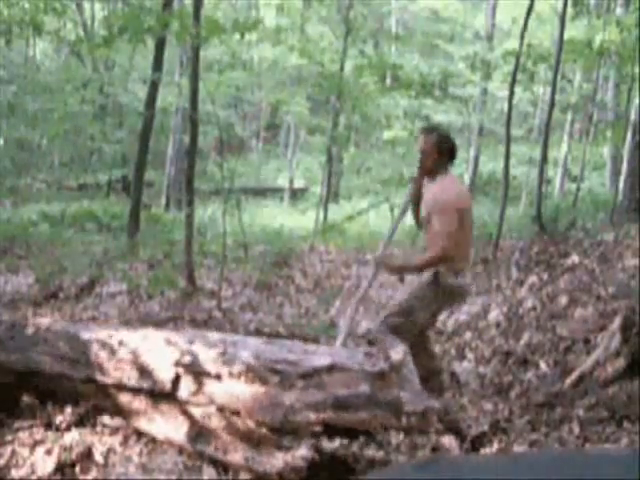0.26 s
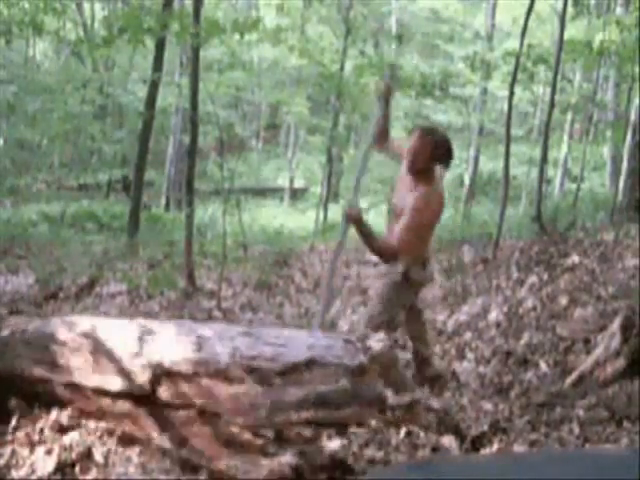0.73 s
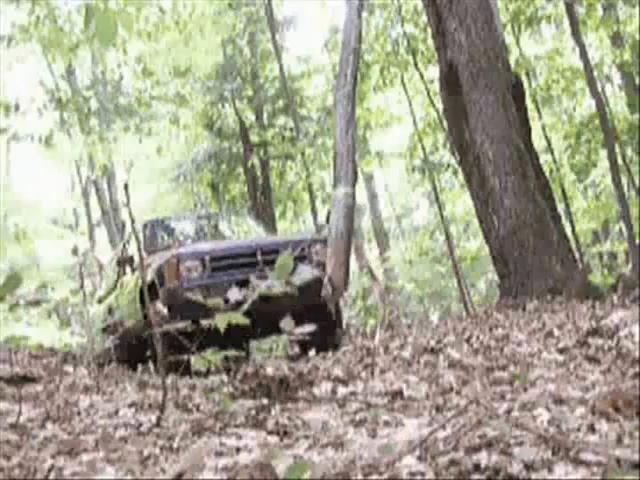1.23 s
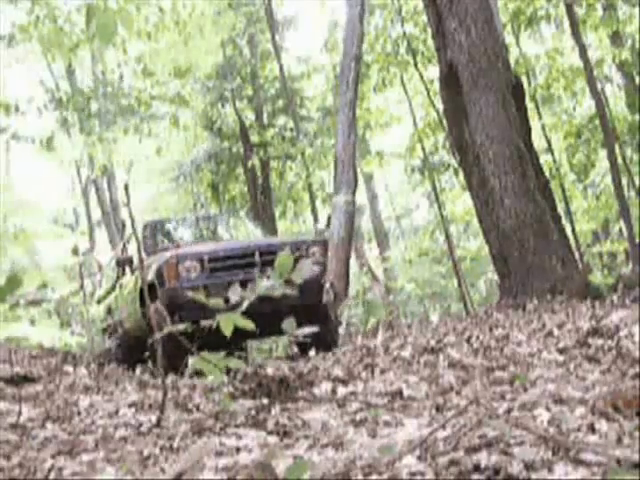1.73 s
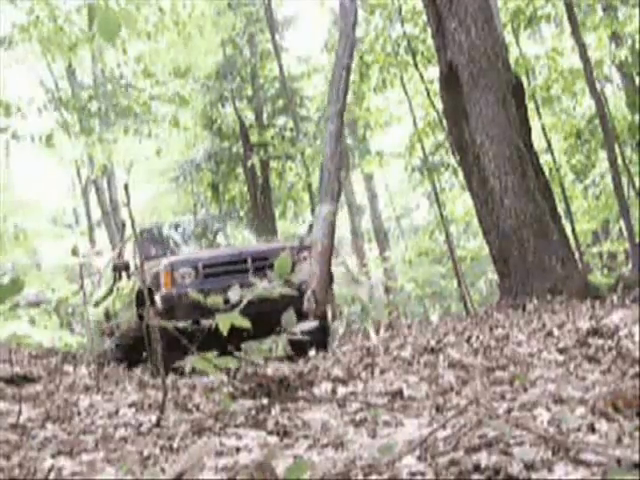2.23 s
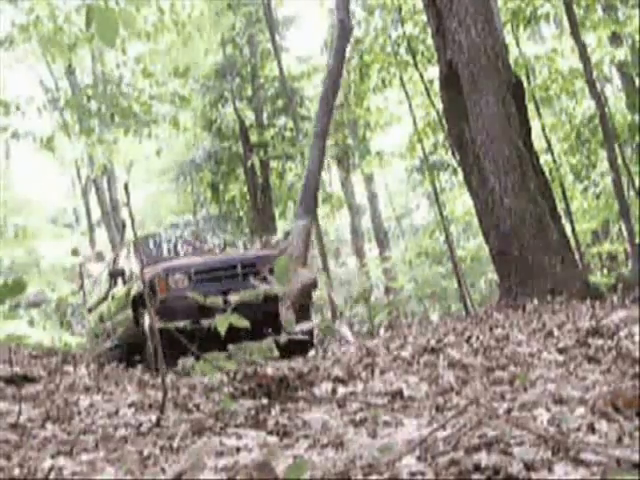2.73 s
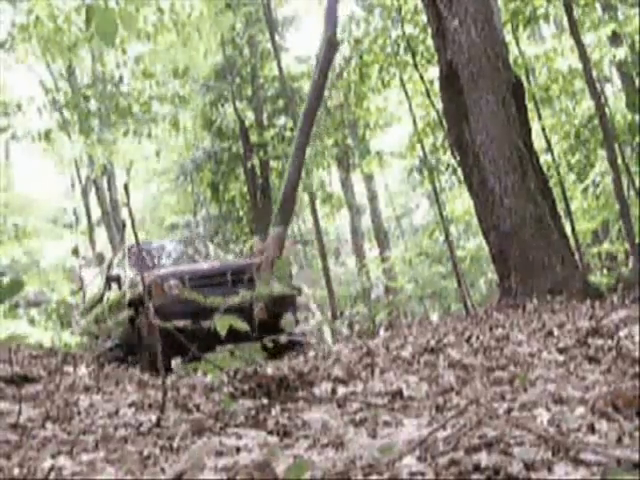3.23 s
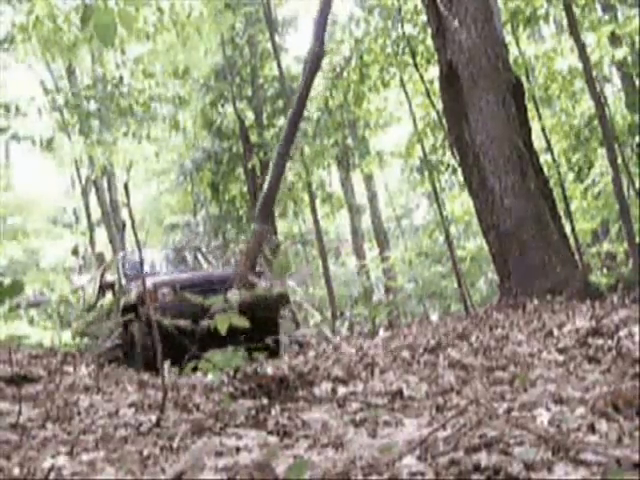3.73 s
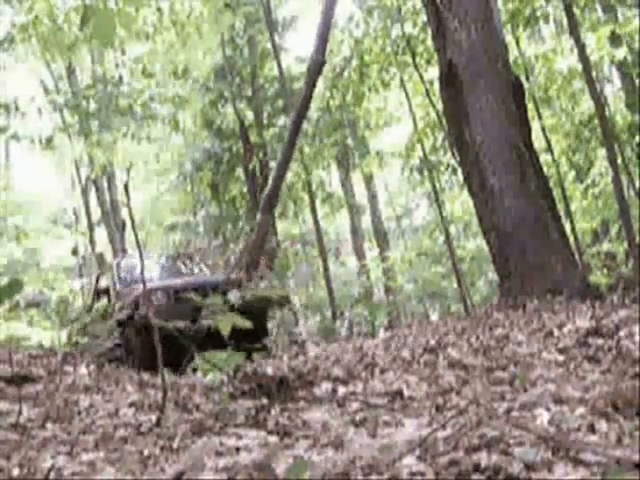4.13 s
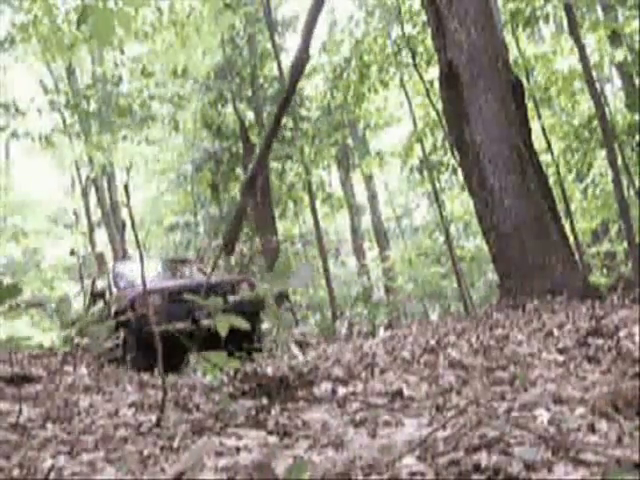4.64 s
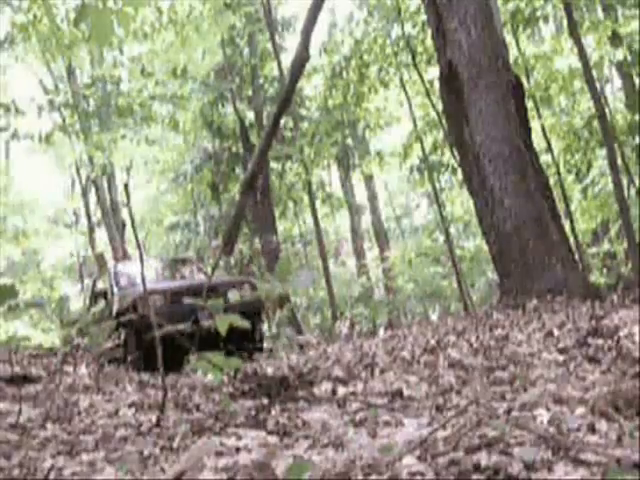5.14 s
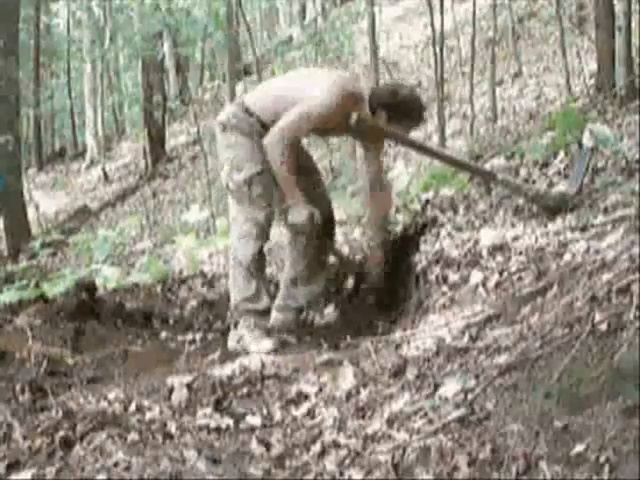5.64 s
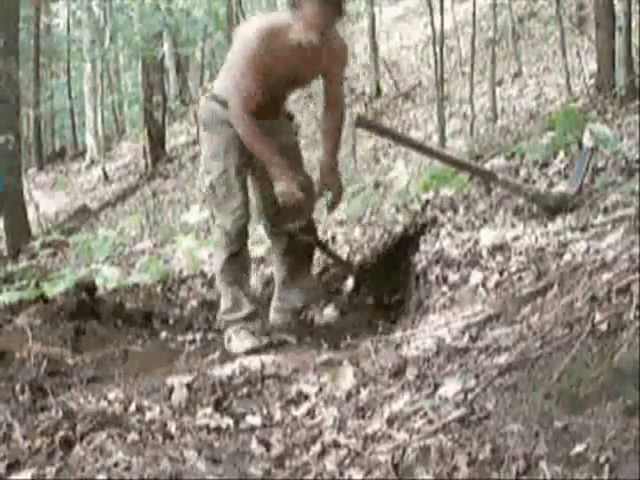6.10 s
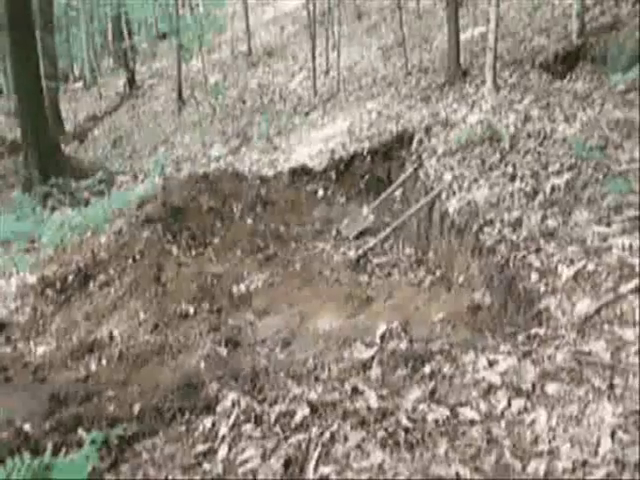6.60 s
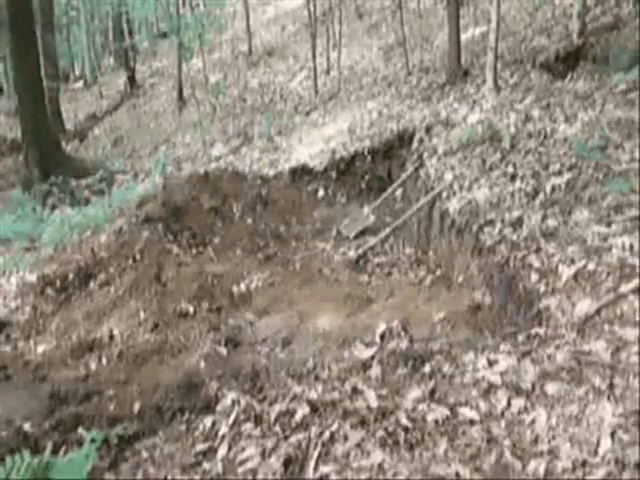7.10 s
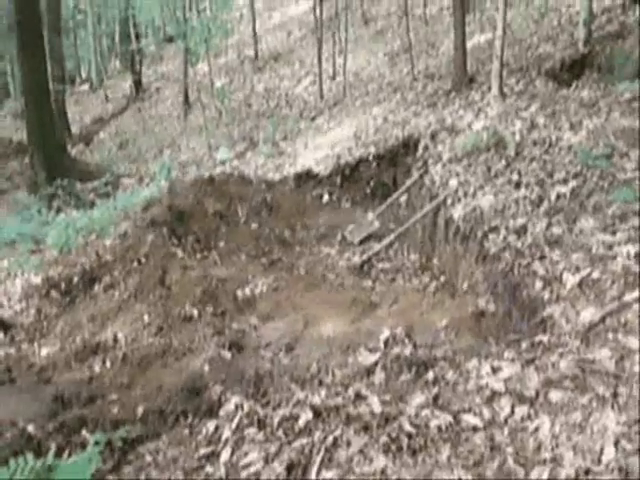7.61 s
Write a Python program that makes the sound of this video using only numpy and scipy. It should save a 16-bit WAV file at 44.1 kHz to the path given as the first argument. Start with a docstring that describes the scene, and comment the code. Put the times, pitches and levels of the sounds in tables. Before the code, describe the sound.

In a forest, leaf litter rustles and scuffs under a heaved pole. Then a truck growls and strains against a tree, its fan hissing. The trunk creaks and gives way with loud, slightly distorted snapping and ripping, ringing briefly among the trees. The engine slows and something thuds. A single sharp crack sprays earth and leaves, and the woods go quiet.

```python
"""A forest floor deep in dry leaves: an off-road truck crawls up to a dead tree and pushes it over.
The engine labours and revs; the trunk creaks, tears and splinters in cracks that echo among the trees.
Cut in before it, a pole is heaved through leaf litter. Cut in after it, one sharp crack scatters earth
at a pit, then the quiet woods fade in. All is mono, clipped on the loud cracks and held at half rate."""
import sys
import numpy as np
from scipy import signal
from scipy.fft import rfft, irfft, next_fast_len
from scipy.io import wavfile
from scipy.ndimage import uniform_filter1d, map_coordinates

SR = 44100
rng = np.random.default_rng(int(sys.argv[2]) if len(sys.argv) > 2 else 0)


def generate_wav(signal):
    """Clip the signal to [-1, 1] and save it as 16-bit WAV at the path in sys.argv[1]."""
    frames = np.transpose(np.atleast_2d(signal))
    scaled = np.clip(frames, -1, 1) * 32767
    pcm = np.round(scaled).astype(np.int16)
    wavfile.write(sys.argv[1], SR, pcm)


N = 346520
TIME = np.arange(N) / SR
TRUCK_IN_S, TRUCK_OUT_S, PIT_OUT_S, WOODS_IN_S = 1.36, 5.368, 6.45, 6.742  # cut points

# wood snapping: t/s, relative level/dB, knock against crack/dB, splinter f/Hz, t60/s
SNAP_CUES = [(1.232, -20.5, -9, 3000, 0.012), (2.263, -16.5, -8, 3700, 0.015),
             (2.301, -13.5, -20.5, 3000, 0.012), (2.382, -20.5, -3, 1990, 0.039),
             (2.652, -7, -20.5, 3600, 0.0084), (2.663, -7, -33, 3900, 0.0085),
             (2.675, -15, -21, 2850, .012), (3.222, -5, -23.5, 3530, .0085), (3.2529, 5.5, 0, 1796, 0.021),
             (3.383, -9, 6.5, 1190, 0.016), (3.436, 2, -7, 3480, 0.012), (3.467, -1, -9.5, 3400, 0.0087),
             (3.5271, -0.5, -0.5, 3080, 0.02), (3.730, -4.5, 1, 3000, 0.004),
             (3.7337, 2, -2.5, 3140, 0.028), (3.756, -6, -2.5, 2450, 0.011), (3.8295, -2.5, 0, 3150, .016),
             (3.867, -9.5, -2.5, 3350, 0.0086), (3.881, -9, -5, 2600, 0.01),
             (3.944, -10.5, -21, 4070, .0087), (3.9632, -6, -7, 2330, .011), (3.968, -5, -8, 3280, 0.012),
             (3.986, -9.5, -4, 3320, .018), (4.075, -6, -3, 3900, 0.011), (4.09, -4, -24.5, 3420, 0.0098),
             (4.153, -14, -17, 3560, 0.024), (4.1598, -5, -16.5, 3540, 0.008),
             (4.1804, -6.5, -10, 3400, 0.0064), (4.2439, -10.5, -6, 2950, 0.011),
             (4.2834, -10.5, -9.5, 3550, 0.0096), (4.307, 2.5, -9, 3350, 0.0057),
             (4.361, 0, -12.5, 2475, 0.011), (4.4822, -11.5, -2.5, 3300, .0065),
             (4.493, -15, -6, 3170, 0.01), (4.5376, -10, -8, 3030, 0.011),
             (4.555, -11.5, -0.5, 2350, 0.0068), (4.606, -5.5, -6, 3070, 0.01),
             (4.6586, 3.5, -12, 3570, 0.0074), (4.668, -4, -14, 3420, 0.0053), (4.678, -9, -15, 3700, 0.01),
             (4.728, -8, -3.5, 2840, .01), (4.787, -6, -9.5, 2140, 0.014), (4.9046, -.5, -24, 2300, 0.0083),
             (5.233, -32.5, 5.5, 1220, 0.044), (5.751, -17, -8, 2930, .02), (5.757, 2.5, -19, 3140, 0.0083),
             (6.085, -34, -7.5, 2900, .025)]
# colours of a snap: f/Hz, level/dB
CRACK_EQ = [(100, -31), (500, -16.5), (1000, -12), (1900, -7.5), (2700, 4), (3600, 2), (4800, -4),
            (7000, -9.5), (8200, -22), (10000, -30)]  # bright edge
KNOCK_EQ = [(30, -23.5), (150, -20), (230, -15.5), (310, -5), (430, -18), (750, 0.5), (1150, 0.5),
            (1750, -0.5), (2500, -13.5), (6000, -40.5)]  # woody body
# echo among the trunks: f/Hz, t60/s
FOREST_DECAY = [(100, .25), (1000, 0.2), (3000, 0.83), (9000, 0.18)]

# swelling gestures: t/s, length/s, level/dB
RIP_CUES = [(3.305, 0.057, -17), (3.555, 0.087, -23), (3.79, .1, -19), (4.38, 0.11, -22.5),
            (4.475, 0.029, -19.5), (4.545, 0.023, -23), (4.69, 0.066, -25)]  # a bundle of fibres lets go
CREAK_CUES = [(2.76, .15, -40), (2.895, .04, -28), (3.02, .22, -35), (3.14, 0.069, -29.5)]  # the trunk bends before it breaks
CRUSH_CUES = [(2.38, 0.066, -30.5), (2.65, 0.025, -18), (4.9, .22, -30.5), (5.215, 0.03, -25.5)]  # a tyre sinks into deep leaves
SCUFF_CUES = [(.895, .015, -26), (.943, 0.014, -29), (1.005, 0.041, -24), (1.085, .02, -29)]  # the pole's foot scuffs the ground
SPILL_CUES = [(5.735, .015, -28), (5.78, 0.026, -26.5)]  # earth and leaves scatter at the pit
# fader rides: t/s, level/dB
STRAIN_RIDE = [(2.2, -53), (2.7, -31), (3.0, -24.5), (3.22, -27), (3.33, -18.5), (3.7, -21), (4.05, -28),
               (4.85, -32.5), (5.1, -33), (5.35, -50)]  # steady tearing in the trunk
FAN_RIDE = [(1.36, -28.5), (2.1, -30), (2.7, -26.5), (4.4, -41), (4.9, -41), (5.25, -31.5)]  # hiss of the engine's fan
RUSTLE_RIDE = [(0, -41), (.13, -37), (.38, -42.5), (.6, -35), (.75, -26.5), (.97, -20.5), (1.03, -16.5),
               (1.11, -19), (1.2, -28.5), (1.36, -28.5)]  # how hard the pole stirs the litter
# colours of the crackling textures: f/Hz, level/dB
FIBRE_EQ = [(150, -36), (450, -21), (850, -6), (1150, -8), (1450, -4), (1900, -6.5), (2400, 1.5), (3400, 1),
            (4400, -6), (6500, -26), (8500, -39), (10000, -51)]
RIP_EQ = [(150, -36), (500, -23.5), (850, -8), (1400, -1), (1900, -2.5), (2500, 1.5), (3400, 3), (4400, -6),
          (6500, -19), (10000, -49.5)]
CREAK_EQ = [(600, -15.5), (1150, -3.5), (1480, 6.5), (1800, -4), (2600, -12), (4000, -30)]
LEAF_EQ = [(530, -40), (900, -20.5), (1320, -12.5), (1430, -8.5), (1540, -10.5), (1800, -7.5), (2250, -6.5),
           (3270, 2.5), (6680, -10), (9040, -26.5), (10000, -30.5), (13000, -78), (22000, -120)]
GRIT_EQ = [(300, -24.5), (1400, -17), (2200, -2), (3300, -0.5), (4200, -1.5), (5500, 0.5), (7000, -2.5),
           (8500, -18), (10000, -24)]  # crumbs of bark and earth
SCRAPE_EQ = [(30, -13), (100, -11.5), (220, -4.5), (600, -1), (1200, -5.5), (2500, -5), (6000, -38)]
SHUFFLE_EQ = [(300, -16), (900, 3), (1500, 1), (2700, -7), (3250, 4.5), (3800, -7), (9000, -34)]  # lightly stirred leaves

# the engine labours and revs against the trunk, ducks far down under the loud cracks, then slows
# and comes back up: t/s, firing f/Hz, fundamental level/dB, overtone drive/dB
ENGINE_RIDE = [(1.36, 41.5, -39.5, -39), (2.1, 35.2, -38.5, -43), (2.32, 33.35, -41, -43),
               (2.6, 37.84, -37, -39), (2.75, 43.44, -47, -37), (2.9, 48.87, -42, -33.5),
               (3.03, 55.7, -36, -33.5), (3.22, 66.2, -38, -35.5), (3.33, 73.5, -61, -45),
               (3.7, 88.9, -63.5, -58), (4.0, 87.6, -53, -67), (4.4, 70.6, -54.5, -59.5),
               (4.9, 44.95, -50.5, -55), (5.22, 31.2, -44.5, -41), (5.37, 28.35, -55, -51)]
# colours of the truck: f/Hz, level/dB
EXHAUST_EQ = [(55, -13), (72, -2), (88, 0.5), (104, -2.5), (118, -9), (138, 2), (158, -3.5), (185, -8),
              (245, -8), (300, -17), (450, -21)]  # pipe and body resonances
RUMBLE_EQ = [(20, -10), (45, -11), (90, -4), (160, 0.5), (240, -3), (400, -11.5), (800, -31.5)]  # gas noise, also the ground thuds
FAN_EQ = [(200, -24), (330, -9), (480, -9.5), (900, -9), (1300, -6.5), (1700, -9.5), (2400, -7.5),
          (3100, -2.5), (3900, -5.5), (4400, -2), (4900, -9.5), (7200, -8.5), (7900, -23), (8700, -19.5),
          (10000, -40)]
WHISTLE_EQ = [(3700, -30.5), (4150, -2.5), (4350, 0.5), (4900, -30)]  # narrow band in the fan's hiss
# dull bumps of pole, wheel and earth: t/s, level/dB, t60/s
THUD_CUES = [(.95, -27, .1), (3.383, -25, 0.18), (5.232, -27, 0.16), (5.756, -23.5, .08)]
# ambience beds: f/Hz, level/dB
HOLLOW_EQ = [(15, -38), (25, -10), (48, -5.5), (81, -2.5), (172, -6.5), (356, -7), (404, -6), (506, -2.5),
             (1020, -7), (1220, -7), (2460, -19.5), (3240, -16.5), (7040, -30), (9050, -41.5), (10000, -55),
             (13000, -92), (22000, -120)]
WOODS_EQ = [(15, -52), (25, -32), (60, 1), (97, -6.5), (200, -8.5), (245, -6.5), (482, -8.5), (519, -8),
            (651, -10.5), (972, -4.5), (1130, -7.5), (3080, -16), (3860, -22.5), (7590, -34), (10000, -53),
            (13000, -98), (22000, -120)]


def wood_snaps():
    """Each break is a burst that holds an instant and dies; the splinter rings, thick wood knocks."""
    track, t = np.zeros(N + SR), np.arange(SR // 10) / SR
    for start, db, knock_db, splinter_hz, t60 in SNAP_CUES:
        attack = 1 - np.exp(-t / 0.00012)
        envelope = attack * amp(-60 * np.maximum(t - 0.15 * t60, 0) / t60)
        drift = 0.032 * np.cumsum(rng.standard_normal(len(t)))  # ragged wood has no pure pitch
        ring = amp(-3) * unit(envelope * np.sin(2 * np.pi * splinter_hz * t + drift))
        crack = unit(envelope * noise(CRACK_EQ, size=len(t)))
        knock = amp(knock_db) * unit(envelope * noise(KNOCK_EQ, size=len(t)))
        gain = amp(db - 5) * np.sqrt(np.mean(envelope ** 2))
        track[round(start * SR):][:len(t)] += gain * (crack + ring + knock)
    direct = track[:N]
    send_eq = [(300, 4), (1300, -3.5), (2800, -1.5), (5000, 1.5), (9000, 3)]  # scooped mids
    send = filtered(direct, lambda hz: amp(at_hz(send_eq, hz)))
    near = forest_echo(send, [(200, 0.12), (3000, 0.081), (9000, 0.063)])  # ground and nearest trunks
    far = forest_echo(send, FOREST_DECAY)
    return direct + amp(-12.5) * near + amp(-13.5) * far


def tearing_trunk():
    """The bending trunk creaks, rips its fibres and sheds bark; leaves shake and crunch under tyres."""
    strain_db, = automation(STRAIN_RIDE)
    fray_cues = [(start, 0, -20 + 0.72 * db) for start, db, *_ in SNAP_CUES]  # each snap frays fibres
    tear = np.hypot(amp(strain_db), swells(fray_cues, attack=0.006, t60=0.21))
    crush = np.hypot(amp(-7) * tear, swells(CRUSH_CUES, attack=0.017, t60=0.6))
    fibres = tear * crackle(FIBRE_EQ, rate=450, spread_db=2.1, blur_db=1.5, clump_db=1.46)
    rips = swells(RIP_CUES, attack=0.014, t60=0.12)
    rips *= crackle(RIP_EQ, rate=260, spread_db=1.5, blur_db=-1, clump_db=1.3)
    leaves = crush * crackle(LEAF_EQ, rate=600, spread_db=4, blur_db=4.5, clump_db=2)
    bark = amp(-11) * crush * crackle(GRIT_EQ, rate=360, spread_db=2.5, blur_db=-4.5, clump_db=2)
    creaks = swells(CREAK_CUES, attack=0.031, t60=0.17)
    creaks *= crackle(CREAK_EQ, rate=94, spread_db=3, blur_db=-1.5, clump_db=-0.9)
    return (fibres + rips + leaves + bark + creaks) * gate(TRUCK_IN_S, TRUCK_OUT_S)


def truck_engine():
    """Firing orders sweep through the exhaust's resonances in a low growl; the fan hisses on top."""
    firing_hz, fundamental_db, overtone_db = automation(ENGINE_RIDE)
    fan_db, = automation(FAN_RIDE)
    phase = 2 * np.pi * np.cumsum(firing_hz * (1 + 0.005 * wobble(16))) / SR
    overtones = np.zeros(N)
    for order in range(2, 7):
        order_db = at_hz(EXHAUST_EQ, order * firing_hz) - 5.5 * np.log2(order / 2) + 0.97 * wobble(14)
        overtones += amp(order_db) * np.sin(order * phase + rng.uniform(0, 2 * np.pi))
    growl = np.sqrt(2) * (amp(fundamental_db) * np.sin(phase) + amp(overtone_db) * overtones)
    puffs = 1 + 0.28 * np.cos(phase)  # gas noise comes once a firing
    rumble = noise(RUMBLE_EQ) * puffs * (amp(overtone_db - 6) + amp(-47.5))
    whistle = amp(-10 + 4 * wobble(30)) * noise(WHISTLE_EQ)  # fluttering
    fan_gain = amp(fan_db - 0.5 + 0.75 * wobble(18)) * (1 + 0.12 * np.cos(phase))
    fan = fan_gain * (noise(FAN_EQ) + whistle)
    return (growl + rumble + fan) * gate(TRUCK_IN_S, TRUCK_OUT_S)


def heaved_pole():
    """Leaves rustle up to a peak as the pole is heaved; its weight scrapes and scuffs, over forest air."""
    rustle_db, = automation(RUSTLE_RIDE)
    rustle = amp(rustle_db + 0.27) * crackle(LEAF_EQ, rate=900, spread_db=-0.5, blur_db=5.5, clump_db=0.5)
    scrape_db = -34.5 + 0.95 * (rustle_db + 22)  # the low scrape follows the rustle
    weight = np.hypot(amp(scrape_db), swells(SCUFF_CUES, attack=0.01, t60=0.16))
    scrape = weight * crackle(SCRAPE_EQ, rate=400, spread_db=3.5, blur_db=3, clump_db=1.7)
    air = amp(-41.3) * noise(WOODS_EQ)
    return (rustle + scrape + air) * gate(0, TRUCK_IN_S)


def ground_thuds():
    """Soft ground takes a weight with a short, dull thud."""
    track, t = np.zeros(N + SR), np.arange(SR // 3) / SR
    for start, db, t60 in THUD_CUES:
        envelope = amp(db - 0.5 - 60 * t / t60) * (1 - np.exp(-t / 0.003))
        track[round(start * SR):][:len(t)] += envelope * noise(RUMBLE_EQ, size=len(t))
    return track[:N]


def earth_at_pit():
    """Earth scatters, then leaves stir lightly over the steady rush of the hollow."""
    scatter = swells(SPILL_CUES, attack=0.013, t60=0.53)
    scatter *= crackle(GRIT_EQ, rate=840, spread_db=0, blur_db=7, clump_db=2.5)
    stir = amp(-42) * swell(start=6.05, length=0.17, attack=0.06, t60=0.56)
    stir *= crackle(SHUFFLE_EQ, rate=510, spread_db=1.5, blur_db=3, clump_db=0.5)
    rush = amp(-38.6 + 0.3 * wobble(6)) * noise(HOLLOW_EQ)
    return (scatter + stir + rush) * gate(TRUCK_OUT_S, PIT_OUT_S)


def forest_echo(x, decay):
    """Trunks and ground throw back a diffuse tail, a fresh one for each quarter second of sound."""
    wet, step = np.zeros(N + SR), SR // 4
    for start in range(0, N, step):
        hz, t, bands = signal.stft(rng.standard_normal(SR // 2), SR, nperseg=256)
        fade = amp(-60 * t / at_hz(decay, hz)[:, None])
        _, tail = signal.istft(bands * fade, SR, nperseg=256)
        echo = signal.fftconvolve(x[start:start + step], tail / np.linalg.norm(tail))
        wet[start:start + len(echo)] += echo
    return wet[:N]


def quiet_woods():
    """A bed of distant forest air fades in with a faint, wavering low hum."""
    fade_end_s, fade_db_per_s = 7.199, 62
    bed_db = -39 - fade_db_per_s * np.maximum(fade_end_s - TIME, 0)
    hum_gain = amp(-13 + 1.7 * wobble(7))
    hum_hz = 67 + wobble(4.85)
    hum = hum_gain * np.sin(2 * np.pi * np.cumsum(hum_hz) / SR)
    return amp(bed_db) * (noise(WOODS_EQ) + hum) * gate(WOODS_IN_S, np.inf)


def crackle(eq, rate, spread_db, blur_db, clump_db):
    """Tiny uneven fractures, rate a second, over a blur of fainter ones; the level comes in clumps."""
    sizes = amp(spread_db * np.minimum(rng.exponential(size=N), 2.5))
    ticks = (rng.random(N) < rate / SR) * sizes
    envelopes = signal.lfilter([1], [1, -np.exp(-1 / (0.0005 * SR))], ticks)  # 0.5 ms decay
    grains = envelopes * rng.standard_normal(N)
    texture = unit(grains) + amp(blur_db) * rng.standard_normal(N)
    return coloured(texture * amp(clump_db * wobble(70)), eq)


def swell(start, length, attack, t60):
    """An envelope that rises, holds until its length is over and dies away; times in seconds."""
    t = TIME - start
    return np.clip(t / attack, 0, 1) * amp(-60 * np.clip((t - length) / t60, 0, 2))


def swells(cues, attack, t60):
    """One swell for each cue, summed in power."""
    return np.sqrt(sum((amp(db) * swell(start, length, attack, t60)) ** 2 for start, length, db in cues))


def automation(ride):
    """A per-sample curve for each column after the time."""
    times, *columns = np.transpose(ride)
    return [np.interp(TIME, times, column) for column in columns]


def gate(start, end):
    """Open from start to end, with quick fades."""
    return uniform_filter1d(1. * ((TIME >= start) & (TIME < end)), size=200)


def wobble(rate):
    """Smooth random movement, rate knots a second."""
    return map_coordinates(rng.standard_normal(int(N * rate / SR) + 4), [TIME * rate])


def noise(eq, size=N):
    """Smooth noise through an EQ curve, at rms 1."""
    return coloured(rng.standard_normal(size), eq)


def coloured(x, eq):
    """x through an EQ curve, at rms 1."""
    return unit(filtered(x, lambda hz: amp(at_hz(eq, hz))))


def filtered(x, response):
    """x through a gain that depends on frequency."""
    size = next_fast_len(len(x) + 8192)
    return irfft(rfft(x, size) * response(np.fft.rfftfreq(size, 1 / SR)), size)[:len(x)]


def at_hz(points, hz):
    """Read a curve on a log frequency axis."""
    freqs, values = np.transpose(points)
    return np.interp(np.log(hz + 1), np.log(freqs), values)


def amp(db):
    """Decibels to gain."""
    return 10 ** (np.asarray(db) / 20)


def unit(x):
    """Scale to rms 1."""
    return x / np.sqrt(np.mean(x ** 2) + 1e-20)


def scene():
    """All layers in one mono mix, on both channels."""
    mono = heaved_pole() + truck_engine() + tearing_trunk() + wood_snaps()
    mono += ground_thuds() + earth_at_pit() + quiet_woods()
    return np.array([mono, mono])


def record(dry):
    """Loud cracks clip; holding every second sample mirrors the treble above 11 kHz."""
    clipped = np.clip(dry[0], -1, 1)
    narrow = filtered(clipped, lambda hz: 1 / (1 + (hz / 9600) ** 40))
    held = np.repeat(np.clip(narrow, -1, 1)[::2], 2)[:N]
    out = filtered(held, lambda hz: np.clip((16100 - hz) / 400, 0, 1))  # steep high cut
    return np.array([out, out])


dry = scene()
out = record(dry)
generate_wav(out)
```